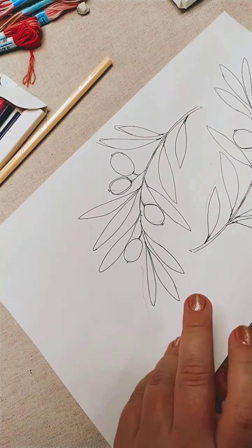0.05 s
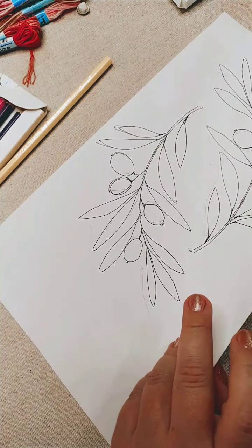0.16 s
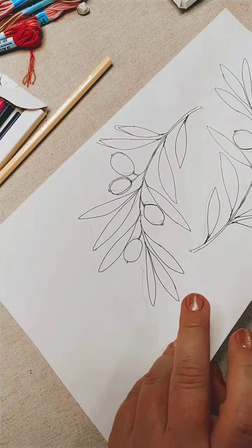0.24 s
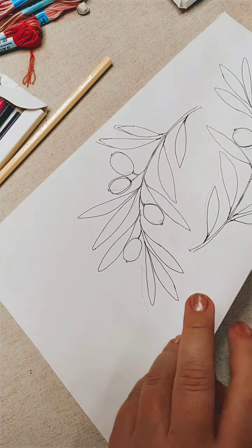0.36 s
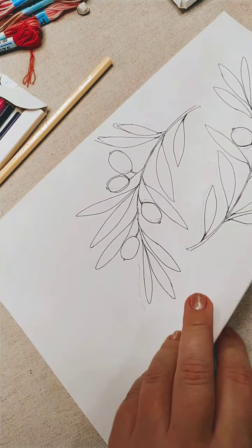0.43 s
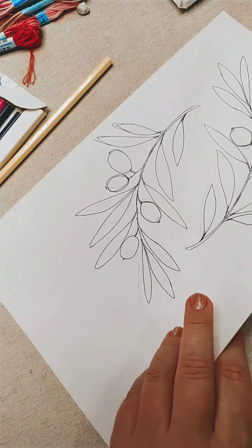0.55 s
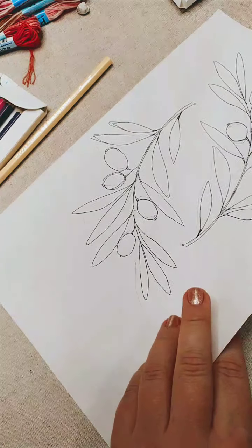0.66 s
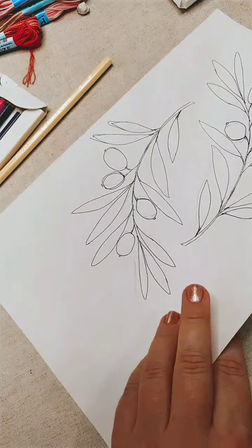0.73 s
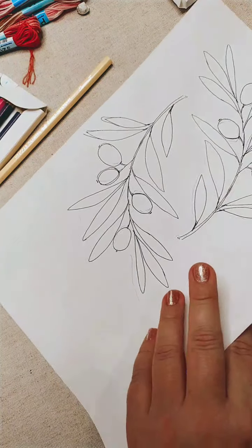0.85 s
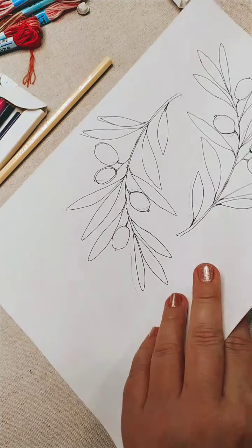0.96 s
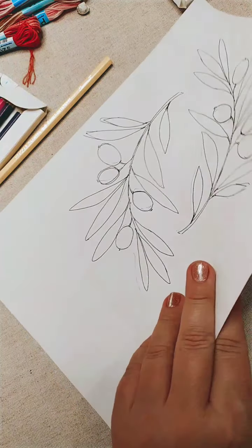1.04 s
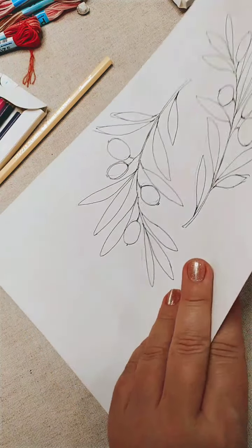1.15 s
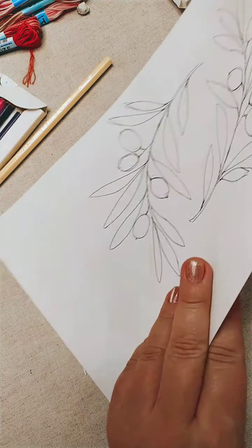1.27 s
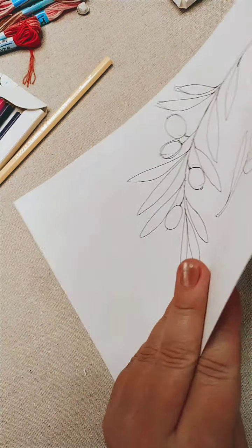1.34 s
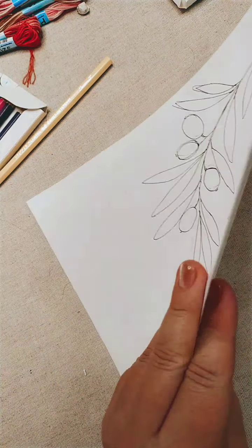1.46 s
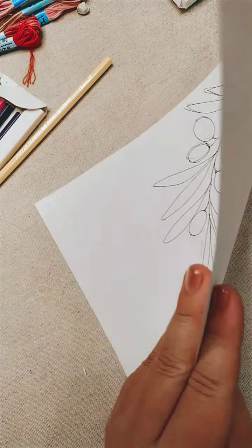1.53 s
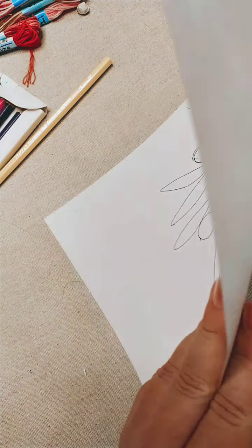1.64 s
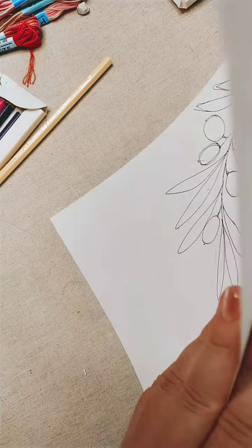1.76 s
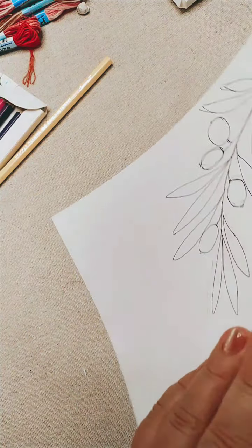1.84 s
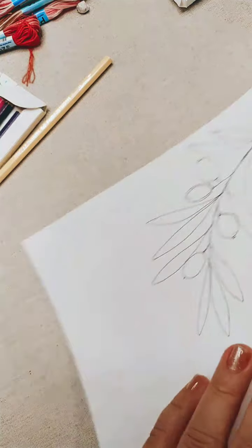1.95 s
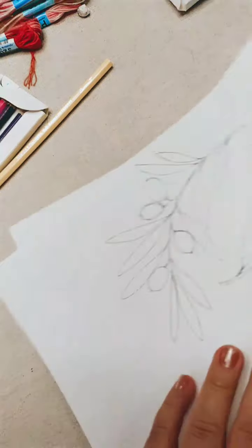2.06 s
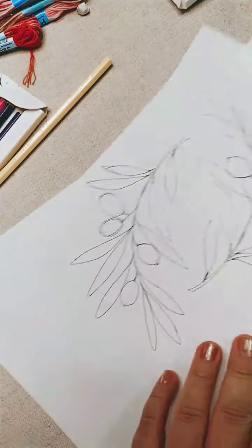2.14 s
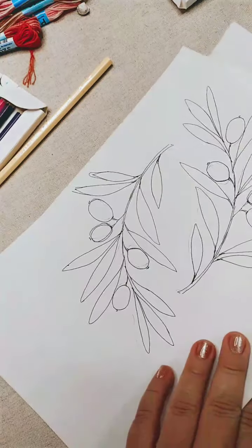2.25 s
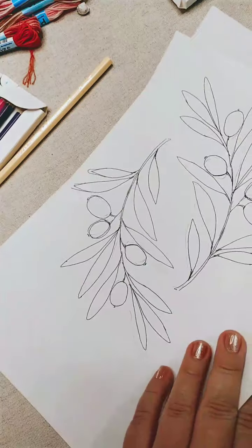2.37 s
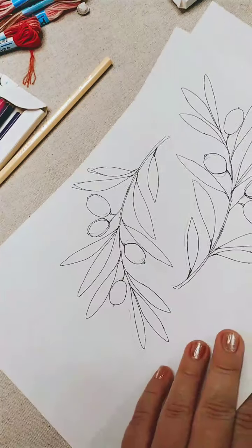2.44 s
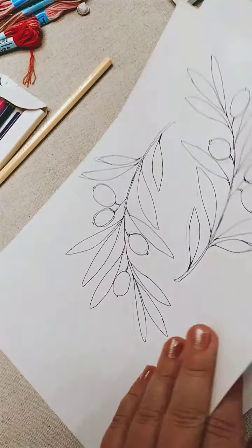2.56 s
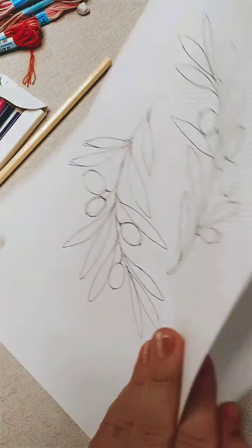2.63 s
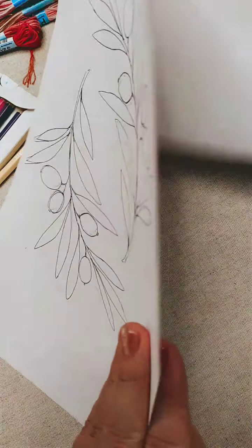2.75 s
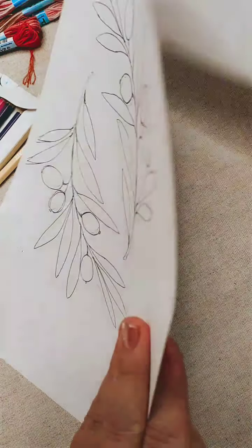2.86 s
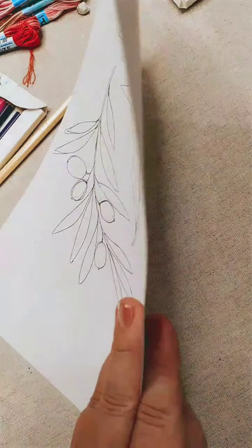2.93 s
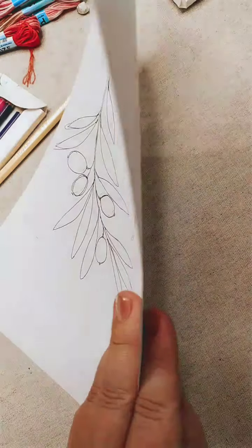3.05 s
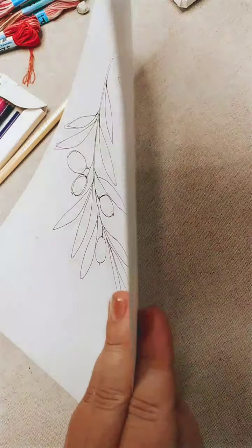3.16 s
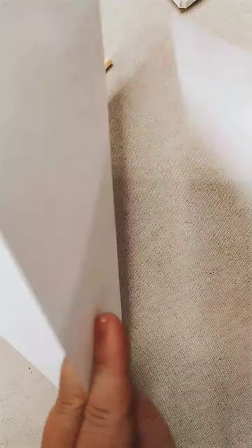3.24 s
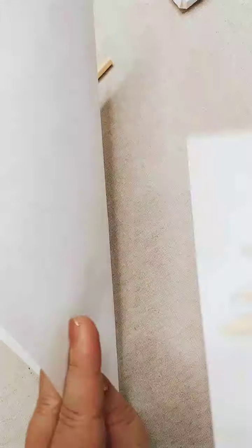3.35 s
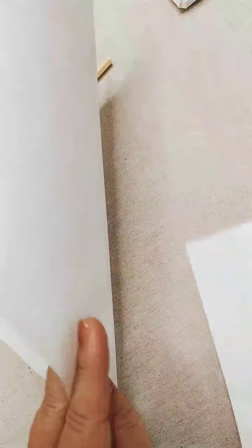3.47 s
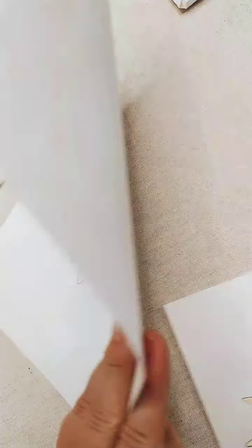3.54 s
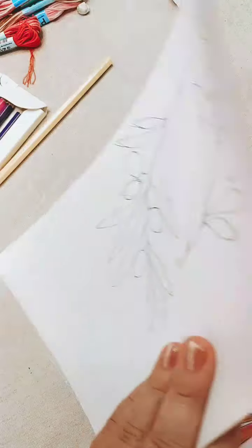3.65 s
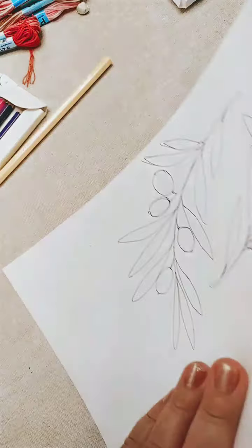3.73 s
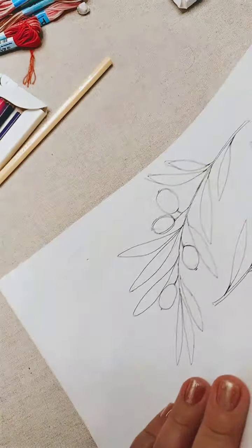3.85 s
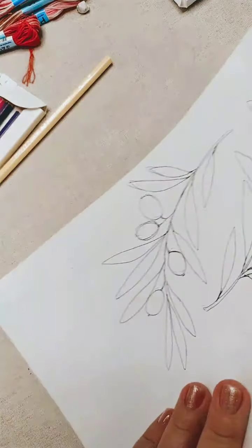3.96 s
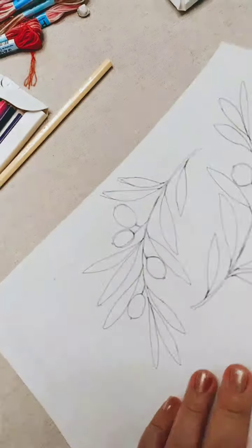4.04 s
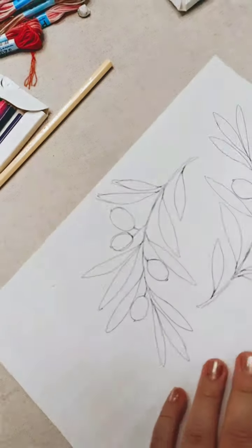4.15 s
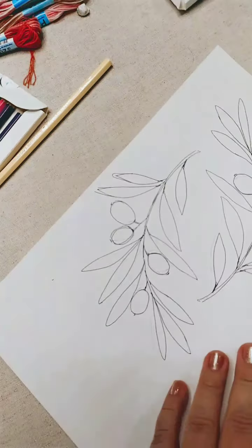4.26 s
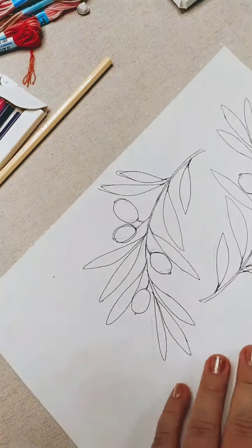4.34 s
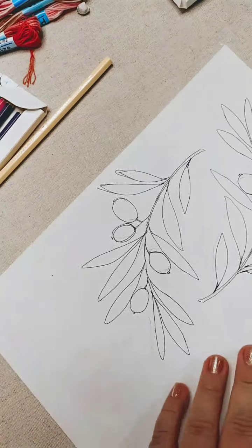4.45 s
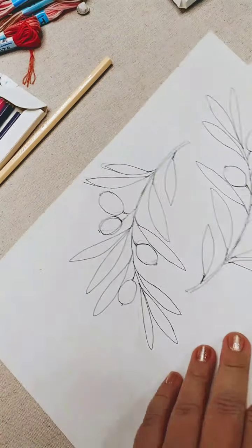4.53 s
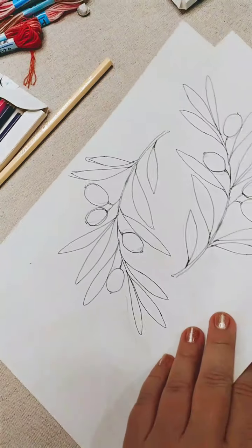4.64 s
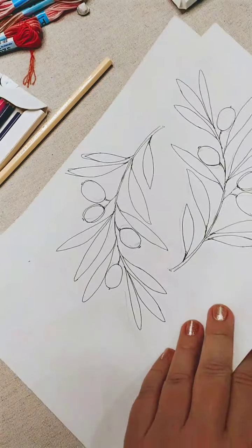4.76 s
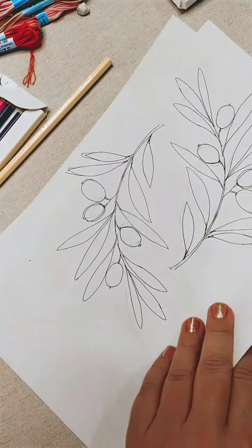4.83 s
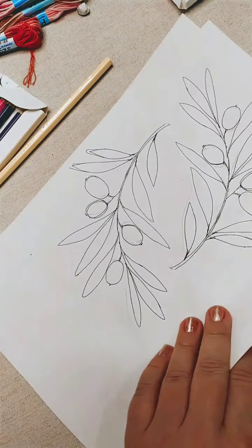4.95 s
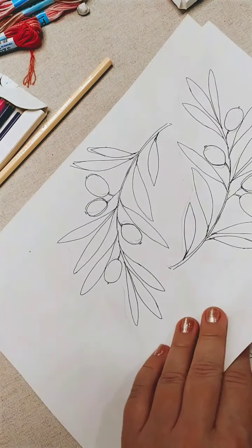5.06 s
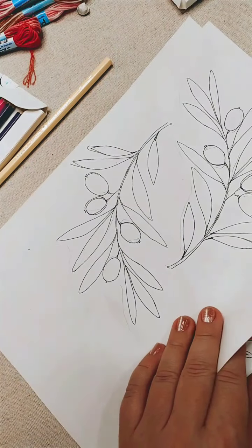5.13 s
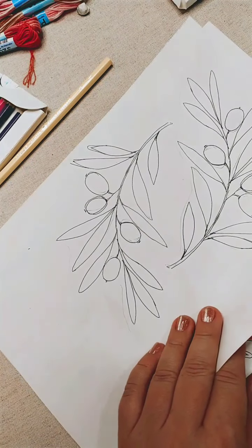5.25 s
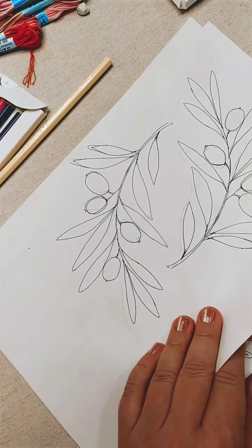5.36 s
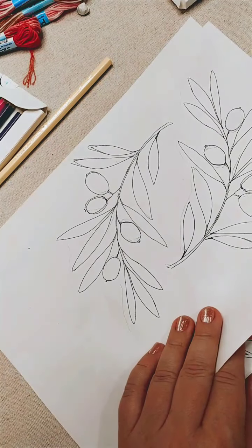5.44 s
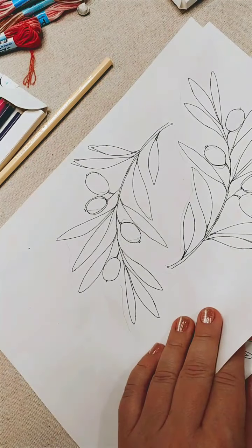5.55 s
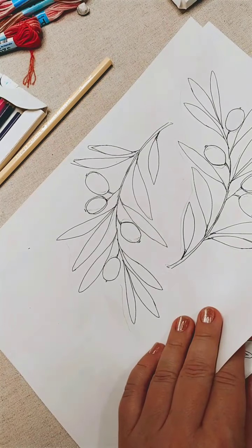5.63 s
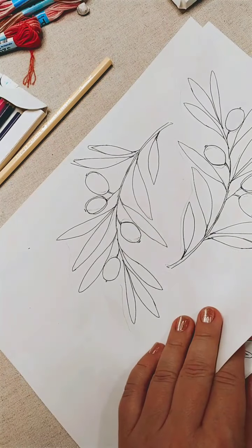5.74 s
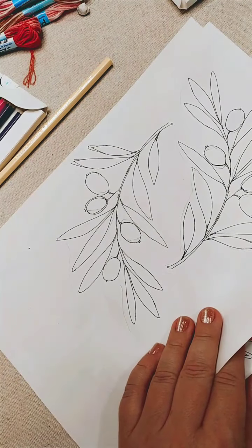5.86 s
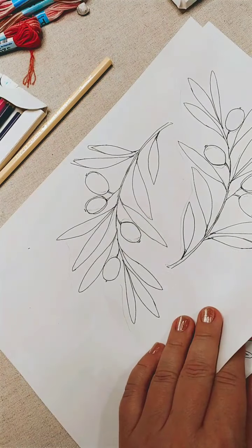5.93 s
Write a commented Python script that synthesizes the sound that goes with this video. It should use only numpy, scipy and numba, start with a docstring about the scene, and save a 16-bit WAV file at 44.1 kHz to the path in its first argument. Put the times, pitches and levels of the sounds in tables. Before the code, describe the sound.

Sheets of drawing paper hiss and rub under a hand, then snap sharply and crackle as they are lifted and flapped down in a quiet room.

```python
"""A quiet room, a cloth-covered table, the microphone close: a hand shifts and lifts sheets of drawing paper.
Sheet rubs on sheet, noise and tiny clicks making a fine hiss; rough sine tones make a few thin squeaks.
The paper buckles in bursts of small snaps, once sharply, and creases pop as falling chirps.
It flaps down on a cushion of air, a dying low tone; the hand rubs dully and edges scrape.
Filtered noise and two low resonances form the room rumble beneath it all."""
import sys
import numpy as np
from scipy import signal
from scipy.fft import rfft, irfft, next_fast_len
from scipy.io import wavfile
from scipy.ndimage import map_coordinates
from numba import njit

SR = 44100
rng = np.random.default_rng(int(sys.argv[2]) if len(sys.argv) > 2 else 0)


def generate_wav(signal):
    """Clip the signal to [-1, 1] and save it as 16-bit WAV at the path in sys.argv[1]."""
    frames = np.transpose(np.atleast_2d(signal))
    scaled = np.clip(frames, -1, 1) * 32767
    pcm = np.round(scaled).astype(np.int16)
    wavfile.write(sys.argv[1], SR, pcm)


N = 264409
TIME = np.arange(N) / SR
CUTOFF_HZ = 10400  # steep treble cut over everything

# relative colour of a flapping sheet and of the dull hand rub: (frequency [Hz], density [dB per Hz])
FLAP_COLOUR = [(50, -37), (80, -6.5), (120, 4.5), (170, -5.5), (550, -5), (750, -7.5), (1500, -56)]
# the hand pushes a sheet along: (start [s], length [s], release [s], hiss at mid-push [dB],
# rustle at mid-push before its trim [dB], growth over the push [dB], centre of the hiss [Hz])
PUSHES = [(-0.02, 0.017, 0.021, -47.5, -57, 3.5, 5260), (0.21, 0.21, 0.02, -63.5, -66.5, -8, 4190),
          (0.326, 0.1, 0.036, -58.5, -59.5, -0.5, 3880), (0.457, 0.11, 0.04, -49, -55.5, -2.5, 4770),
          (0.519, 0.41, 0.013, -64.5, -63, -3, 5000), (0.901, 0.11, 0.037, -63.5, -67.5, 1, 5050),
          (1.044, 0.047, 0.01, -55, -78, -7, 5260), (1.115, 0.28, 0.029, -66, -67, -20, 5540),
          (1.416, 0.12, 0.068, -69.5, -57, -13.5, 4300), (1.644, 0.23, 0.037, -63, -51, 4, 4570),
          (1.834, 0.21, 0.029, -59, -52, -1, 4090), (1.958, 0.2, 0.024, -56, -53, -6, 4160),
          (2.158, 0.19, 0.06, -54, -61.5, -8.5, 4800), (2.431, 0.26, 0.048, -53.5, -58.5, 9.5, 4510),
          (2.722, 0.13, 0.019, -67, -51, 0.5, 4720), (2.826, 0.11, 0.006, -60, -62, -9.5, 5110),
          (2.927, 0.085, 0.014, -72.5, -70, -7, 3160), (3.077, 0.23, 0.013, -60.5, -57.5, -5.5, 5730),
          (3.389, 0.041, 0.029, -71, -59.5, -7, 3980), (3.479, 0.27, 0.028, -59, -62, -6, 5260),
          (3.752, 0.099, 0.036, -54.5, -71.5, -1, 4200), (3.873, 0.13, 0.024, -63.5, -65.5, -2, 5050),
          (3.992, 0.11, 0.055, -59.5, -66, 1, 3880), (4.112, 0.22, 0.014, -61.5, -90, 11.5, 4470),
          (4.289, 0.096, 0.012, -66.5, -73.5, -1, 3540), (4.401, 0.18, 0.032, -60.5, -68.5, -4, 4400),
          (4.563, 0.22, 0.0072, -59, -63.5, 1, 5090), (4.797, 0.093, 0.029, -77.5, -66.5, -2, 4830),
          (4.875, 0.19, 0.015, -61, -63, -11.5, 5310)]


def from_db(db):
    """Decibels to gain."""
    return 10 ** (np.asarray(db) / 20)


def rms_one(x):
    """Scale to unit power."""
    return x / np.sqrt(np.mean(x ** 2) + 1e-20)


def drift(rate):
    """Smooth chance with rms 1, changing about `rate` times a second."""
    knots = rng.standard_normal(8192)
    return rms_one(map_coordinates(knots, [TIME * rate], order=3, mode="wrap"))


def swell(s, rise, decay):
    """A motion builds up exponentially to time s and then dies away."""
    exponent = np.where(TIME < s, (TIME - s) / rise, (s - TIME) / decay)
    return np.exp(np.maximum(exponent, -40))


def colour(x, spectrum):
    """Causal (minimum-phase) filter that follows a spectrum table."""
    size = next_fast_len(N + 8192)
    hz, db = np.transpose(spectrum)
    bins_hz = np.arange(size // 2 + 1) * SR / size
    log_gain = np.log(from_db(np.interp(np.log(bins_hz + 1), np.log(hz), db)))
    # folding the cepstrum onto positive time makes the filter minimum-phase
    cepstrum = irfft(log_gain, size)[:size // 2]
    cepstrum[1:] *= 2
    response = np.exp(rfft(cepstrum, size))
    return irfft(rfft(x, size) * response, size)[:N]


def resonate(x, hz, width):
    """Two-pole resonance with gain 1 on top."""
    r = np.exp(-np.pi * width / SR)
    feed = np.array([1, 0, -1]) * (1 - r * r) / 2
    return signal.lfilter(feed, [1, -2 * r * np.cos(2 * np.pi * hz / SR), r * r], x)


@njit
def two_pole(x, turn, r):
    """Resonator whose pitch (radians per sample) may change at every sample."""
    out = np.zeros(len(x))
    for i in range(2, len(x)):
        push = (1 - r * r) / 2 * (x[i] - x[i - 2])
        out[i] = push + 2 * r * np.cos(turn[i]) * out[i - 1] - r * r * out[i - 2]
    return out


def glide(x, hz, width):
    """A resonance with a moving centre and gain 1 on top."""
    return two_pole(x, 2 * np.pi * hz / SR, np.exp(-np.pi * width / SR))


def slips(per_s, spread_db, smooth):
    """Fibres catch and let go: tiny clicks of uneven size over a smooth rub."""
    unevenness = np.minimum(rng.exponential(1, N), 4)
    sizes = from_db(spread_db * unevenness) * rng.choice([-1, 1], N)
    clicks = sizes * (rng.random(N) < per_s / SR)
    return rms_one(clicks) + smooth * rng.standard_normal(N)


def sheet(force, spectrum, bend_octaves=0.021, bend_rate=5):
    """A force on the paper heard through its broad colour and its drifting resonances; rms 1."""
    # resonances of the bowed sheet over the table: (pitch before bending [Hz], width [Hz], level [dB])
    sheet_modes = [(853, 50, -1.5), (1312, 18, -9), (1458, 32, -0.5), (1730, 33, -9.5), (1860, 54, 2.5),
                   (2110, 12, -8), (3380, 57, -0.5)]
    bend = 2 ** (bend_octaves * drift(bend_rate))
    rings = sum(from_db(db) * glide(force, hz * bend, width) for hz, width, db in sheet_modes)
    return rms_one(colour(force + rings, spectrum))


def wander(x, patch_db, patch_rate, patch_width=260, emphasis=lambda hz, s: 0):
    """As the contact travels over the sheet, its resonances come and go in patches of time and pitch; rms 1."""
    hz, s, cells = signal.stft(x, SR, nperseg=512, noverlap=384)
    grid = np.meshgrid(hz / patch_width, s * patch_rate, indexing="ij")
    patches = map_coordinates(rng.standard_normal((256, 256)), grid, order=2, mode="wrap")
    cells = cells * from_db(patch_db * patches + emphasis(hz[:, None], s))
    return rms_one(signal.istft(cells, SR, nperseg=512, noverlap=384)[1][:N])


def background():
    """Steady noise of the room, and its low resonances stirred by more such noise into a wandering rumble."""
    # relative colour of the room noise: (frequency [Hz], density [dB per Hz])
    room_noise = [(55, -22.5), (100, -2), (190, 0), (280, -5), (400, -12), (2000, -20.5), (5500, -25.5),
                  (9000, -30.5), (10500, -38)]
    # low resonances of the room: (pitch [Hz], width [Hz], rms level [dB])
    room_modes = [(109.5, 9.1, -74.5), (173.4, 16, -81.5)]
    out = from_db(-72) * rms_one(colour(rng.standard_normal(N), room_noise))
    stir = colour(rng.standard_normal(N), room_noise)
    for hz, width, db in room_modes:
        out += from_db(db) * rms_one(resonate(stir, hz, width))
    return out


def push_levels():
    """Hiss and rustle in dB: each push gets going, grows or fades while it lasts, and dies away."""
    attack_s = 0.038
    hiss_power = rustle_power = 1e-12
    for start, length, release, hiss_db, rustle_db, growth_db, _ in PUSHES:
        age = TIME - start
        held = from_db(growth_db * (np.clip(age / length, 0, 1) - 0.5))
        shape = np.clip(age / attack_s, 0, 1) * held * swell(start + length, np.inf, release)
        hiss_power = hiss_power + (from_db(hiss_db) * shape) ** 2
        rustle_power = rustle_power + (from_db(rustle_db) * shape) ** 2
    return 10 * np.log10(hiss_power), 10 * np.log10(rustle_power)


def lie(s):
    """Flatness of the sheet and pitch of the air gap at times s."""
    # how the sheet lies as it slides: (time [s], flatness [0 lifted - 1 flat], pitch of the air gap [Hz])
    flatness = [(0, 0.36, 1460), (.3, 0.58, 1320), (0.421, 0.13, 1535), (1.199, 0.3, 1363),
                (1.9, 0.15, 1450), (2.35, 0.43, 1404), (2.7, 0.058, 1455), (3.65, 0.13, 1312),
                (3.87, 0.5, 1360), (3.959, 0.39, 1530), (4.15, 0.9, 1387), (5.1, 0.86, 1410)]
    times, flat, gap_hz = np.transpose(flatness)
    return np.clip(np.interp(s, times, flat), 0, 1), np.interp(s, times, gap_hz)


def sag_cut(hz, s, depth_db=13, half_s=0.035, width_hz=850):
    """The sheet sags toward the table and a hollow sweeps through its hiss: the cut in dB."""
    # sagging sheets: (time [s], pitch of the hollow [Hz], glide [Hz per s])
    sags = [(1.35, 3230, -3000)]
    cut = 0
    for at, centre, slope in sags:
        since = s - at
        moving_hz = centre + slope * since
        cut = cut + np.exp(-(since / half_s) ** 2 - ((hz - moving_hz) / width_hz) ** 2)
    return depth_db * cut


def rub_emphasis(hz, s, focus_db=4.0, width_hz=850, thin_db=13.5, thin_hz=2400, thin_width=850):
    """In dB: a broad hump in the hiss glides from push to push, and a flat sheet hisses more thinly."""
    start, length, *_, push_hz = np.transpose(PUSHES)
    centre = np.interp(s, start + length / 2, push_hz)
    flat = lie(s)[0]
    hump = np.exp(-((hz - centre) / width_hz) ** 2)
    hollow = np.exp(-((hz - thin_hz) / thin_width) ** 2)
    return focus_db * hump - thin_db * flat * hollow - sag_cut(hz, s)


def rustling(gap_width=330):
    """A bent sheet rustles broadly; lying flat, it rings in the thin air gap beneath it."""
    # relative colour of the rustle: (frequency [Hz], density [dB per Hz])
    rustle_colour = [(250, -55.5), (500, -0.5), (870, 1), (1130, 1), (1380, -2), (1700, -0.5), (2050, -4),
                     (2900, -5.5), (5000, -41.5)]
    flat, gap_hz = lie(TIME)
    force = slips(per_s=1200, spread_db=2.5, smooth=0.44)
    bent = wander(sheet(force, rustle_colour), patch_db=6.0, patch_rate=13, patch_width=190.0)
    gap = rms_one(glide(glide(force, gap_hz, gap_width), gap_hz, gap_width))
    return np.sqrt(1 - flat) * bent + np.sqrt(flat) * gap


def sliding(rustle_trim_db=-5.0, uneven_db=1.25, uneven_rate=50):
    """Steady rubbing: the sheet flutters, rustles where it bends and hisses where it drags."""
    # relative colour of the hiss, with a steep treble cut above 7.5 kHz: (frequency [Hz], density [dB per Hz])
    hiss_colour = [(1200, -29.5), (2000, 2.5), (5500, 1.5), (6050, -0.5), (6500, -11), (7500, -3),
                   (7750, -25), (9500, -34.5)]
    hiss, rustle = push_levels()
    # flutter follows the rustle dB for dB: -72 dB where the untrimmed rustle is at -61.5 dB
    flutter = from_db(-72 + (rustle + 61.5))
    grip = uneven_db * drift(uneven_rate)  # friction is never quite even
    wobble = wander(colour(rng.standard_normal(N), FLAP_COLOUR), patch_db=10.0, patch_rate=10, patch_width=98)
    fibres = sheet(slips(per_s=4000, spread_db=0.5, smooth=0.53), hiss_colour)
    dragging = wander(fibres, patch_db=4.5, patch_rate=14, patch_width=150, emphasis=rub_emphasis)
    return (flutter * wobble
            + from_db(rustle + rustle_trim_db + grip) * rustling()
            + from_db(hiss + grip / 2) * dragging)


def squeaking(trim_db=11.0, jitter_rate=260, rough_db=2.0):
    """Stick and slip at a paper edge: a narrow, rough whistle."""
    # squeaks: (time [s], rise [s], decay [s], pitch [Hz], pitch jitter [Hz], level before trim [dB])
    squeaks = [(0.004, 0.015, 0.019, 5730, 128, -64.5), (0.215, 0.0073, 0.0053, 3410, 248, -57),
               (0.496, 0.012, 0.013, 5510, 113.5, -53.5), (0.505, 0.014, 0.024, 6070, 166, -57.5),
               (0.544, 0.028, 0.025, 5440, 74.5, -52), (5.226, 0.0032, 0.0057, 5150, 320, -77.5)]
    out = np.zeros(N)
    for s, rise, decay, hz, jitter, db in squeaks:
        phase = 2 * np.pi * np.cumsum(hz + jitter * drift(jitter_rate)) / SR
        whistle = np.sin(phase) * from_db(rough_db * drift(jitter_rate))
        out += from_db(db + trim_db) * swell(s, rise, decay) * rms_one(whistle)
    return out


def buckling(flap_trim_db=-4.0, crisp_trim_db=-2.5):
    """Avalanches of small snaps: a tight bow rings higher and narrower, a hard snap reaches further up."""
    # the sheet buckles or lands: (time [s], rise [s], decay [s], pitch of the bow [Hz],
    # flap level before trim [dB], body level [dB], crisp level before trim and treble cut [dB])
    buckles = [(.067, 0.0069, 0.041, 1860, -63.5, -64, -57), (0.212, 0.01, .0066, 1590, -71, -56.5, -59),
               (1.088, .0067, 0.0082, 1980, -51.5, -40.5, -43.5),
               (1.098, .0035, 0.0051, 1780, -48, -32.5, -27.5),
               (1.108, .002, 0.0045, 1300, -38.5, -31.5, -31.5),
               (1.125, .004, 0.034, 1260, -51, -48, -48.5), (1.415, .0057, 0.031, 1380, -56.5, -59.5, -57),
               (1.569, 0.0026, 0.021, 1130, -47.5, -49.5, -60.5),
               (1.617, 0.0032, 0.0096, 1600, -59, -50.5, -56), (1.652, 0.0042, .008, 1380, -45.5, -40, -39),
               (1.724, 0.0054, 0.0095, 1580, -57, -41, -44.5), (1.746, 0.0063, 0.033, 1380, -51, -42, -51),
               (1.987, 0.0033, 0.024, 1450, -46.5, -51.5, -44), (2.591, 0.008, 0.012, 1740, -84, -43, -44),
               (2.648, 0.0053, 0.014, 1900, -52.5, -38, -33.5),
               (2.667, 0.0054, 0.036, 1650, -63, -40.5, -46), (2.721, 0.0054, 0.012, 1500, -43, -49.5, -42),
               (2.75, 0.0058, 0.022, 1790, -75, -40.5, -54), (3.096, 0.0036, 0.013, 1390, -38, -46.5, -46),
               (3.172, .0076, 0.012, 1310, -44, -40.5, -31), (3.222, 0.017, 0.027, 1050, -48.5, -57, -54),
               (3.329, .0033, 0.021, 1300, -51, -50, -86), (3.374, 0.0012, 0.0072, 1490, -48.5, -39, -69),
               (3.499, 0.0029, 0.15, 1470, -66, -53, -74), (3.538, 0.0045, .021, 1850, -49, -45, -45),
               (3.903, 0.0087, 0.014, 1000, -57, -53, -84), (4.032, 0.0052, 0.071, 950, -64, -60.5, -72),
               (4.271, .0067, 0.012, 1790, -78, -61.5, -58), (5.157, 0.0095, 0.012, 1300, -65.5, -72, -96)]
    # relative colour of the bowed sheet: (frequency [Hz], density [dB per Hz])
    body_colour = [(250, -15.5), (500, -4.5), (870, 12.5), (1400, 8), (2150, -0.5), (2700, -6),
                   (3400, -6.5), (5000, -50.5)]
    # relative colour of the crisp part, with a steep treble cut above 7.5 kHz:
    # (frequency [Hz], density [dB per Hz])
    crisp_colour = [(1200, -27), (2000, 6), (3500, 6.5), (4800, 10), (5600, 8.5), (6050, 5.5), (6500, -5.5),
                    (7450, 7), (7750, -21), (9500, -35.5)]
    snaps = slips(per_s=4200, spread_db=1.5, smooth=0.22)
    # the whole sheet slaps the air: 340 Hz, 380 Hz wide
    flap = rms_one(resonate(colour(snaps, FLAP_COLOUR), 340, 380))
    body = sheet(snaps, body_colour)
    crisp = sheet(snaps, crisp_colour)
    out = np.zeros(N)
    for s, rise, decay, hz, flap_db, body_db, crisp_db in buckles:
        width = 1400 * (1500 / hz) ** 2  # 1400 Hz wide for a bow at 1500 Hz
        bow = rms_one(resonate(resonate(body, hz, width), hz, width))
        # treble reaches 6400 Hz at -45 dB and an octave more for every 40 dB
        top_hz = min(6400 * 2 ** ((crisp_db + 45) / 40), CUTOFF_HZ)
        edge = signal.sosfilt(signal.butter(4, top_hz, fs=SR, output="sos"), crisp)
        burst = from_db(flap_db + flap_trim_db) * flap
        burst += from_db(body_db) * bow
        burst += from_db(crisp_db + crisp_trim_db) * edge
        out += swell(s, rise, decay) * burst
    return out


def bumping(rise_s=0.0069, decay_s=0.013, width_hz=127):
    """The hand shifts its weight: skin drags on paper over cloth, a low, rough resonance."""
    # dull rubs: (time [s], length [s], pitch [Hz], level [dB])
    bumps = [(0.082, 0.08, 145, -62.5), (0.183, 0.12, 134, -60.5), (0.527, 0.089, 282, -60.5),
             (1.443, 0.095, 172, -64.5), (1.726, 0.088, 130, -56.5), (2.6, 0.13, 148, -58),
             (2.75, 0.12, 135, -63), (2.927, 0.032, 125, -61.5), (3.103, 0.116, 152, -50.5),
             (3.128, 0.093, 432, -53.5), (3.5, 0.077, 153, -53.5), (4.021, 0.12, 139, -64)]
    force = colour(slips(per_s=710, spread_db=2.0, smooth=0.76), FLAP_COLOUR)
    out = np.zeros(N)
    for s, length, hz, db in bumps:
        shape = swell(s, rise_s, np.inf) * swell(s + length, np.inf, decay_s)
        out += from_db(db) * shape * rms_one(resonate(force, hz, width_hz))
    return out


def puffing(rise_s=0.0063):
    """Air is pushed out from under a sheet, which bounces on it: a low tone that dies away."""
    # puffs: (time [s], pitch [Hz], decay [s], level before rise and decay [dB])
    puffs = [(0.378, 184, 0.021, -49), (3.092, 167, 0.0052, -19), (3.167, 308, 0.0065, -22.5),
             (3.519, 136, 0.021, -38)]
    out = np.zeros(N)
    for s, hz, decay, db in puffs:
        age = np.maximum(TIME - s, 0)
        shape = (1 - np.exp(-age / rise_s)) * np.exp(-age / decay)
        out += from_db(db) * shape * np.sin(2 * np.pi * hz * age)
    return out


def popping(rise_s=0.00083, decay_s=0.0015, lead_s=0.00065):
    """A crease pops in a very short falling chirp, since high bending waves cross the sheet first."""
    # single creases: (time [s], pitch the chirp falls to [Hz], level before rise and decay [dB])
    creases = [(1.101, 1360, -13.5), (1.111, 1260, -22), (2.666, 1750, -30), (2.683, 1580, -31),
               (2.756, 1750, -28), (3.178, 1016, -26.5), (3.537, 1730, -26.5)]
    out = np.zeros(N)
    for s, hz, db in creases:
        age = np.clip(TIME - s, 0, 0.5)
        # the chirp starts an octave high
        phase = 2 * np.pi * hz * (age + lead_s * (1 - np.exp(-age / lead_s)))
        shape = (1 - np.exp(-age / rise_s)) * np.exp(-age / decay_s)
        out += from_db(db) * shape * np.sin(phase)
    return out


def scraping(width_hz=380, fade_s=0.0055):
    """An edge drags over fibres, which ring the short stretch of paper next to it."""
    # brief narrow-band scrapes: (time [s], length [s], pitch [Hz], level [dB])
    scrapes = [(1.21, 0.18, 5320, -78), (2.641, 0.0084, 5590, -40.5), (3.398, 0.03, 3720, -72),
               (3.922, 0.085, 1600, -65.5)]
    force = rng.standard_normal(N)
    out = np.zeros(N)
    for s, length, hz, db in scrapes:
        shape = swell(s, fade_s, np.inf) * swell(s + length, np.inf, fade_s)
        out += from_db(db) * shape * rms_one(resonate(resonate(force, hz, width_hz), hz, width_hz))
    return out


def over_table(x):
    """Reflection from the table top cancels narrow bands of the direct sound."""
    # hollows: (pitch [Hz], width [Hz], depth [0-1])
    hollows = [(744, 120, 0.92), (2572, 69, 0.6), (2994, 81, 0.9), (3524, 63, 0.4), (4393, 80, 1),
               (7213, 450, 0.6)]
    for hz, width, depth in hollows:
        x = x - np.clip(depth, 0, 1) * resonate(x, hz, width)
    return x


def room(x, t60=0.11, tail_db=-5.5, build_up_s=0.00089):
    """A few near reflections and a short diffuse tail of decaying noise around the direct sound."""
    # near reflections from the table and things on it: (delay [s], gain [ratio])
    echoes = [(0.00235, 0.1), (0.00461, 0.15)]
    age = TIME[:SR // 2]
    response = rng.standard_normal(len(age)) * from_db(-60 * age / t60) * (1 - np.exp(-age / build_up_s))
    response *= from_db(tail_db) / np.sqrt(np.sum(response ** 2))
    response[0] = 1  # direct sound
    for delay, gain in echoes:
        response[int(delay * SR)] += gain
    return signal.fftconvolve(x, response)[:N]


def scene():
    """Paper on the table, close to the microphone, in a small quiet room."""
    paper = over_table(sliding() + scraping() + bumping() + buckling() + popping() + squeaking())
    return (room(paper) + puffing() + background())[None]


def record(dry, low_cut_hz=72):
    """The microphone drops the deep bass; the top is cut steeply."""
    thin = signal.sosfilt(signal.butter(4, low_cut_hz, "high", fs=SR, output="sos"), dry)
    return signal.sosfilt(signal.ellip(10, 0.1, 80, CUTOFF_HZ, fs=SR, output="sos"), thin)


dry = scene()
out = record(dry)
generate_wav(out)
```